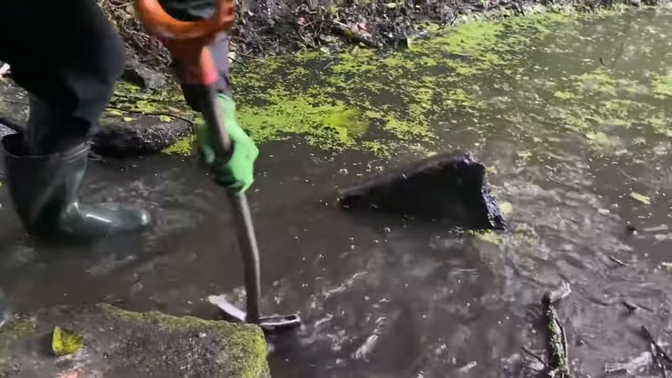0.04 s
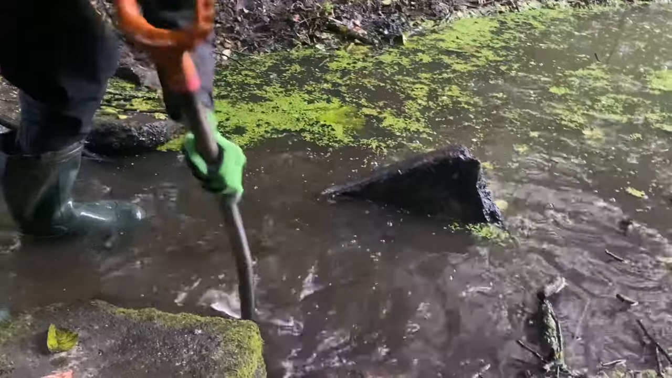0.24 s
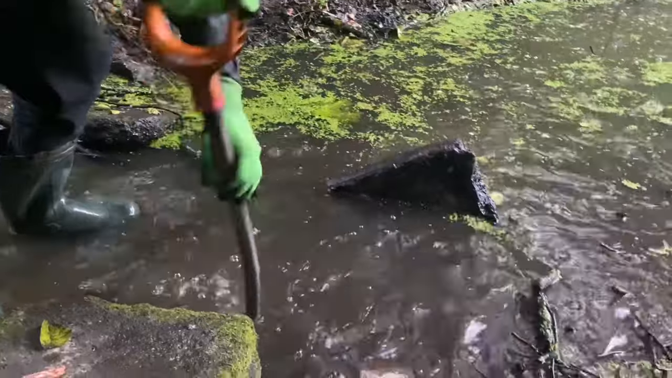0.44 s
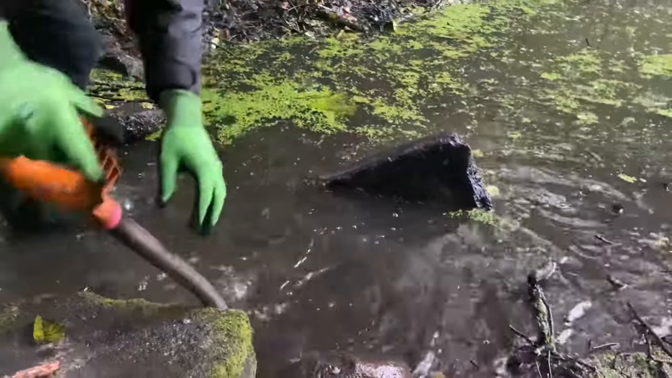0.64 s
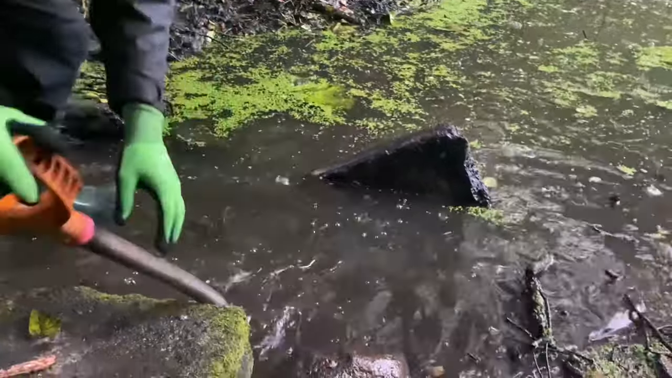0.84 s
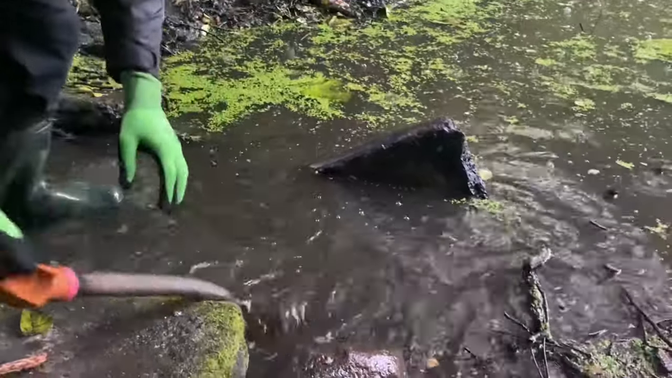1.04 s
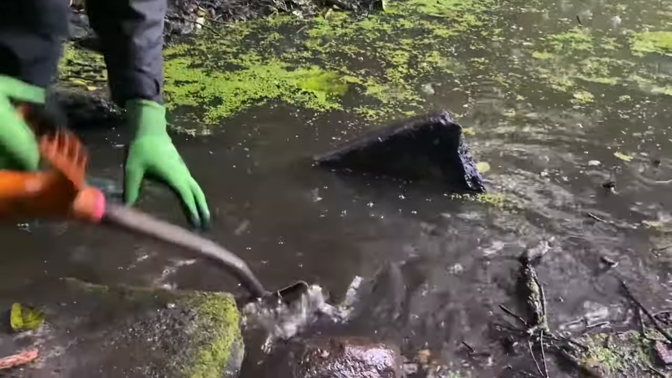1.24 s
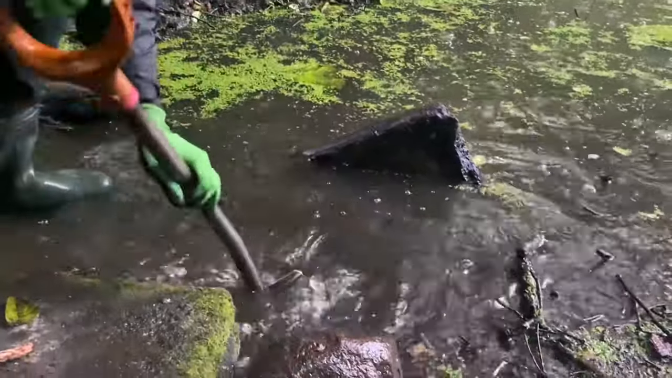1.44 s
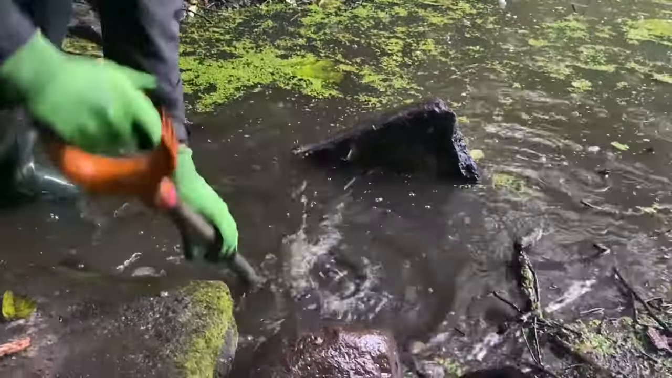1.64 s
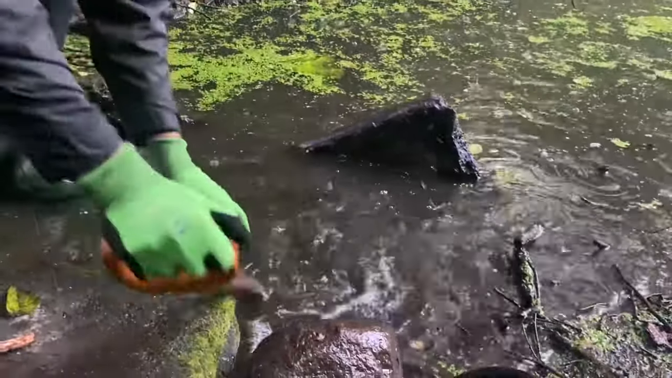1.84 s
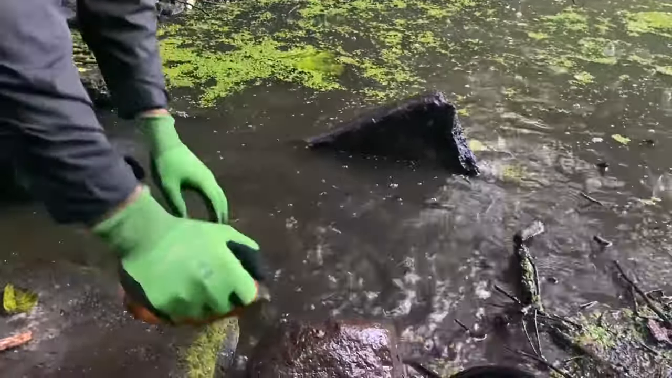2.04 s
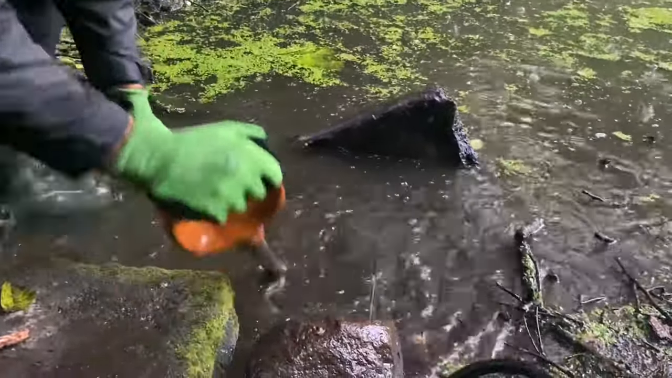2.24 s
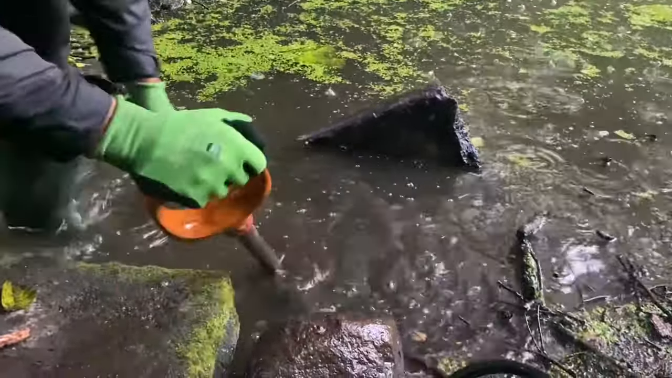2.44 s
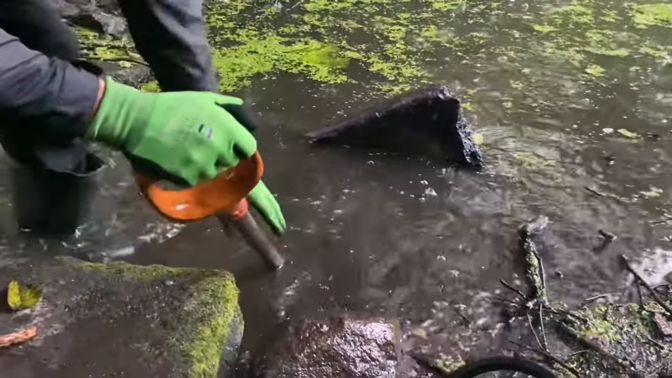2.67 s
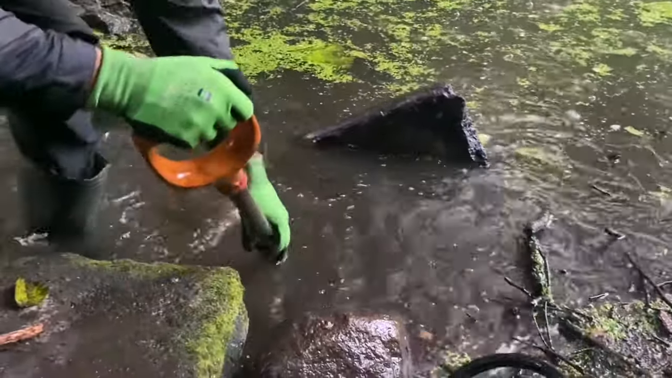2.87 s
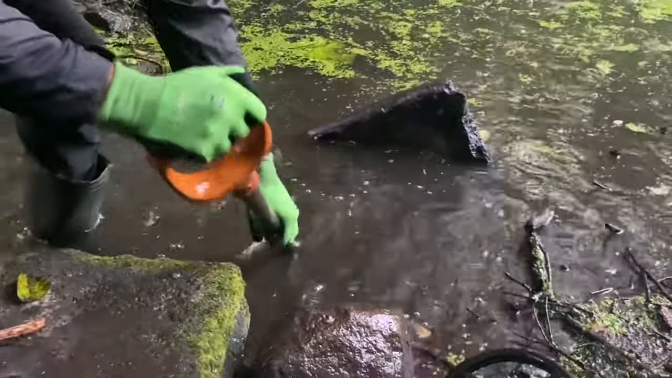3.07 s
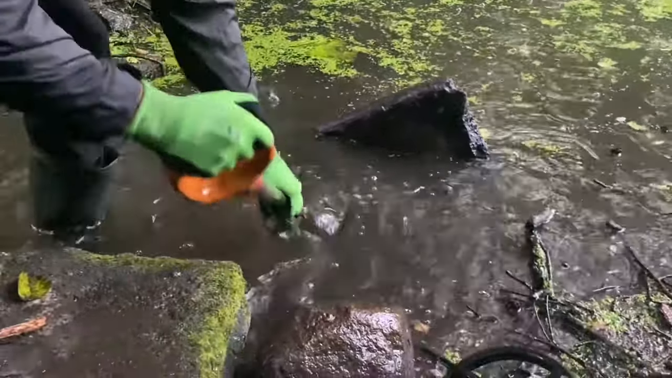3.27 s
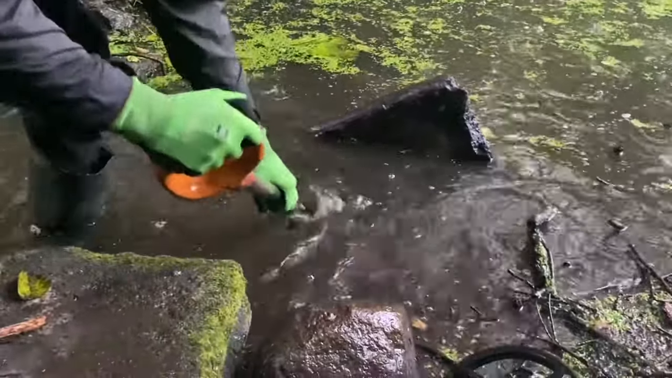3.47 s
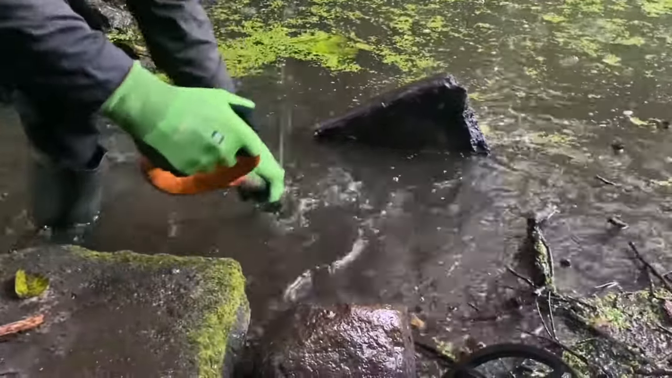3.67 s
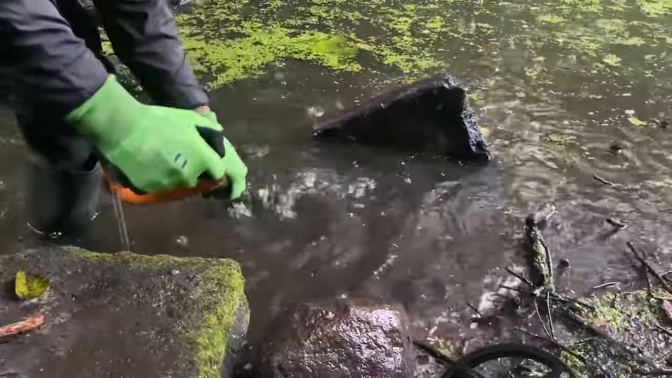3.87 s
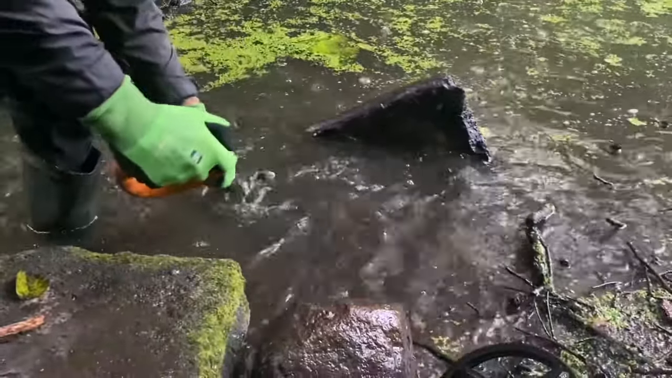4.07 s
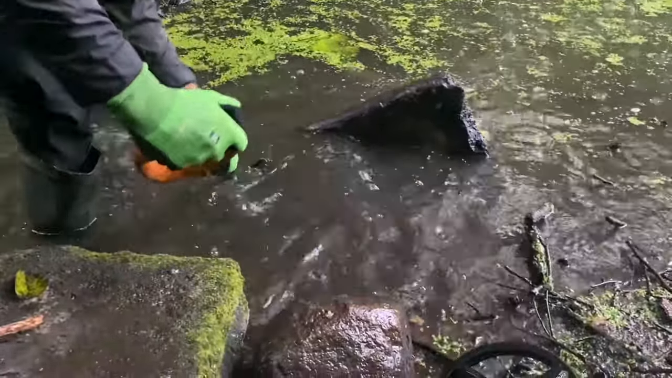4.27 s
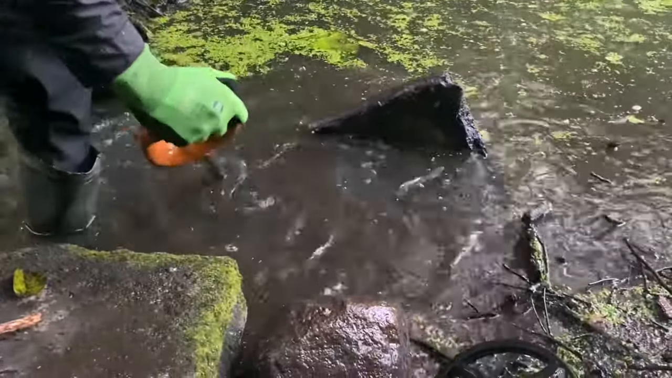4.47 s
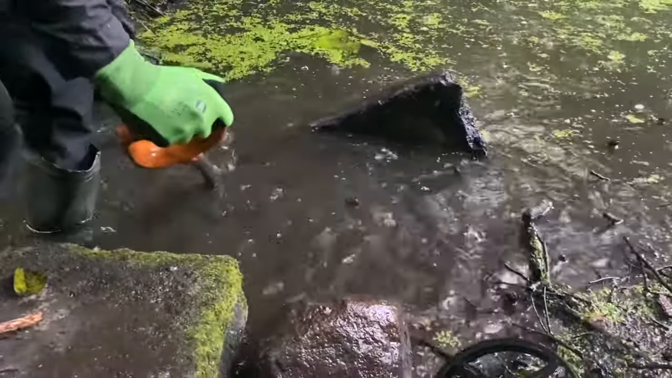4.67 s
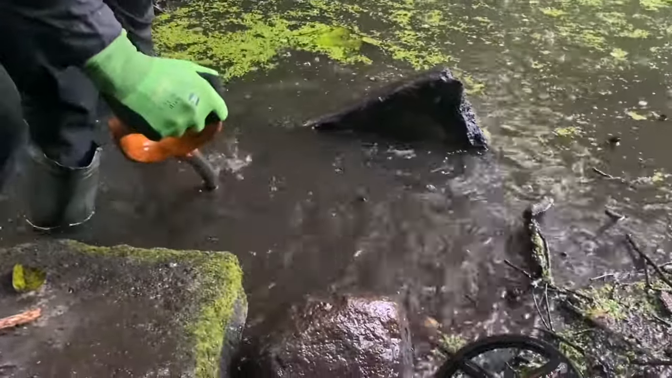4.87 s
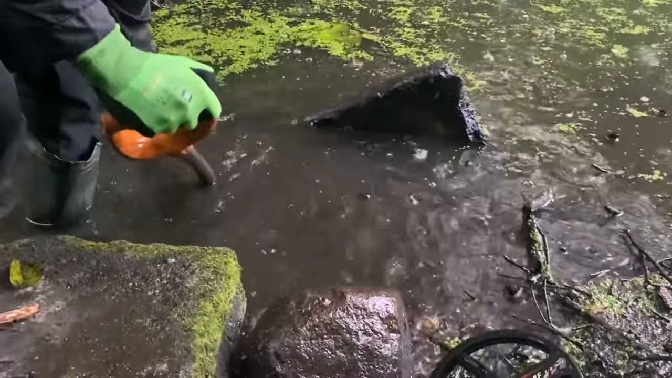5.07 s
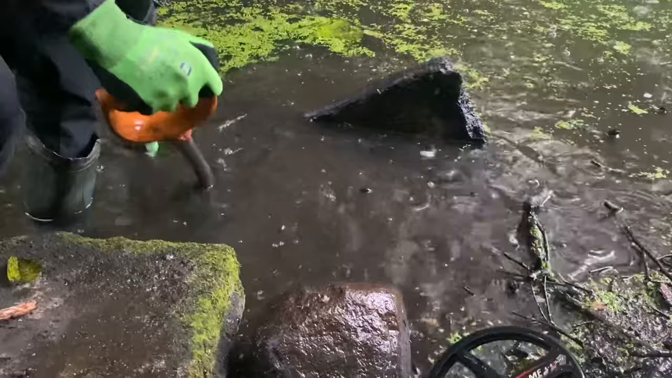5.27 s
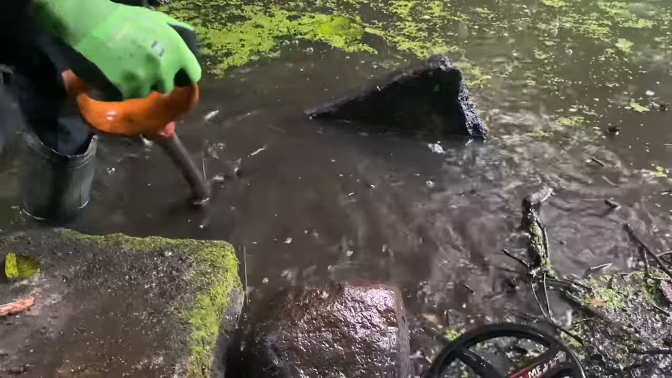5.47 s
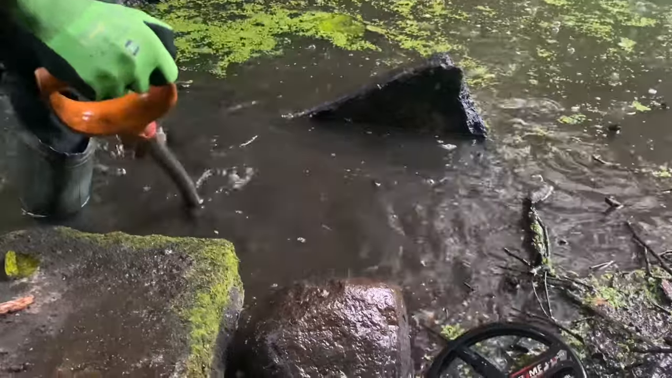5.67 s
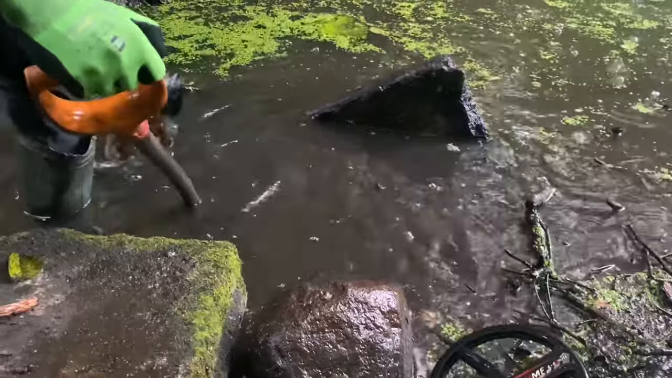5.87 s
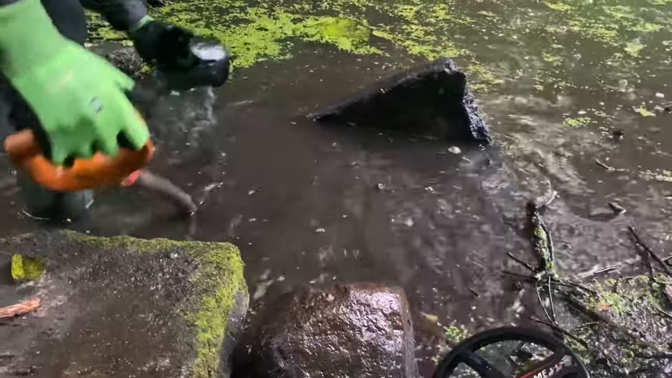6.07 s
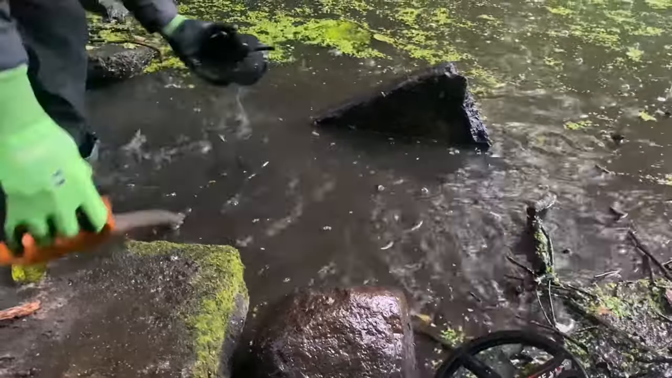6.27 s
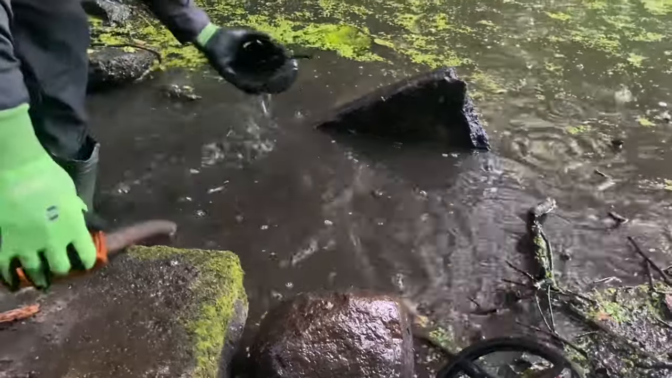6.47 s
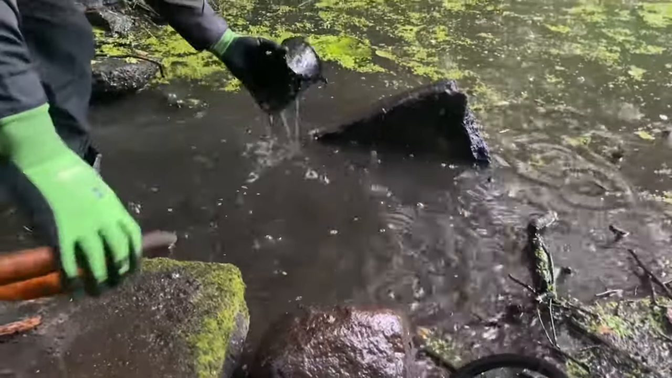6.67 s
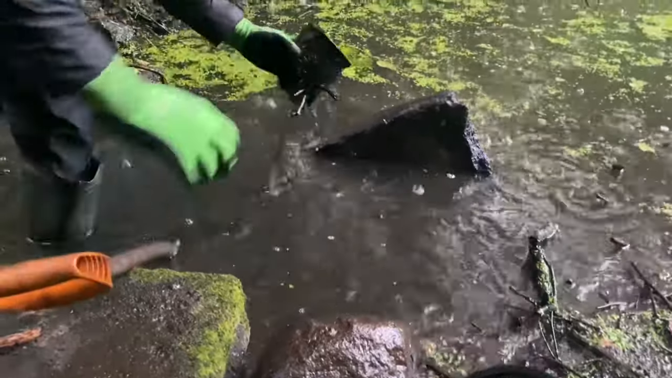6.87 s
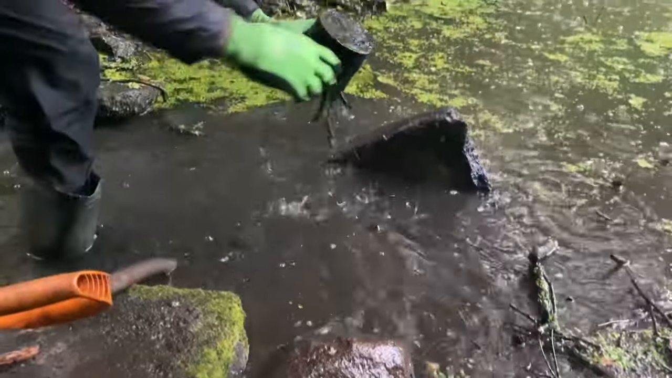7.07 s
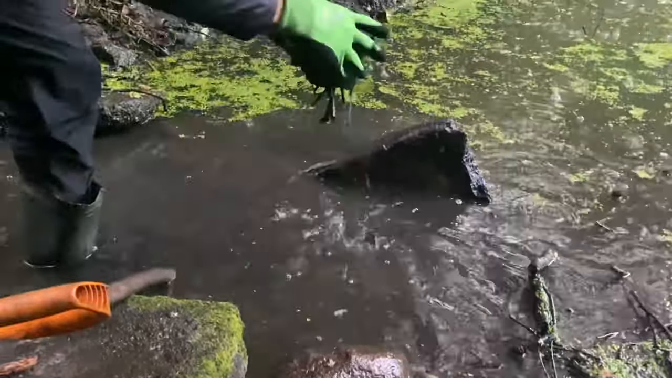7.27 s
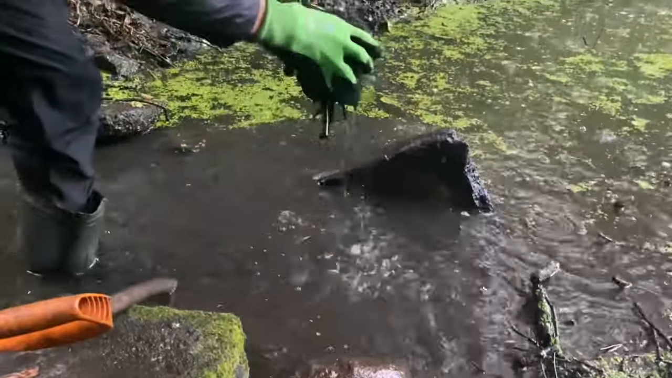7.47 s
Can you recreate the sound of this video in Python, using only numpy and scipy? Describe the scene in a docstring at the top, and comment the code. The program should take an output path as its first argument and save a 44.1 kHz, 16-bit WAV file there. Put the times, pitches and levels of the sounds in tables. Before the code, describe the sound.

Someone digs in a stony, shallow stream bed beside a close stereo microphone. First a short gravel scrape, then a tight cluster of hollow, water-muffled knocks, the loudest moment. Water slaps and bubbles in quick bursts, settles, then another scrape with metal catching on stones. Low heaving churn and small gurgles fade, leaving the quiet patchy stream with drops plinking and ticking onto its surface.

```python
"""A shallow stream trickles while a shovel scrapes through its gravel and knocks dully under water, heard close up.
Stirred water splashes, gulps and bubbles over a low churn; drops plink into the stream, often near the end.
The stream is patchy noise with showers of small bubble rings; rumble, scrapes and splashes are shaped noise and grains.
Knocks and steel catches are ringing modes; gulps, bubbles and drips are sliding tones; ticks are short gritty pings.
Faint reflections surround the near sounds, and the whole is given a stereo width, phase and balance."""
import sys
import numpy as np
from scipy import signal
from scipy.fft import rfft, irfft
from scipy.io import wavfile
from scipy.ndimage import uniform_filter1d

SR = 44100
rng = np.random.default_rng(int(sys.argv[2]) if len(sys.argv) > 2 else 0)


def wrap_up_sound(samples):
    """Save the sound to the file named by the first command line argument, as 16-bit audio."""
    columns = np.atleast_2d(samples).T
    # keep every value between -1 and 1, then stretch to whole-number steps
    tamed = np.clip(columns, -1, 1)
    steps = np.round(tamed * 32767).astype(np.int16)
    wavfile.write(sys.argv[1], SR, steps)


N = 331191
TIME = np.arange(N) / SR


def amp(db):
    """Turns decibels into an amplitude gain."""
    return 10 ** (np.asarray(db) / 20)


def unit(x):
    """Scales a sound to rms 1, all channels together."""
    return x / np.sqrt(np.mean(x ** 2) + 1e-20)


def read(points, hz):
    """Reads a table of values over frequency, on a logarithmic frequency axis."""
    f, value = np.transpose(points)
    return np.interp(np.log(hz + 1), np.log(f + 1), value)


def colour(x, spectrum, tilt_db=0):
    """Filters by a spectrum, tilted in dB per octave about 1.5 kHz, and scales to rms 1."""
    hz = np.fft.rfftfreq(x.shape[-1], 1 / SR)
    octaves = np.log2(np.maximum(hz, 250) / 1500)  # the tilt stops below 250 Hz
    gain = amp(read(spectrum, hz) + tilt_db * octaves)
    return unit(irfft(rfft(x) * gain, x.shape[-1]))


def add(mix, s, sound):
    """Mixes a sound in at time s, cut off at the end of the mix."""
    part = mix[..., max(round(s * SR), 0):][..., :sound.shape[-1]]
    part += sound[..., :part.shape[-1]]


def swell(t, rise, fall):
    """Rounded hump that peaks at t = 0."""
    return np.exp(-abs(t / np.where(t < 0, rise, fall)) ** 2.0)


def waver(size):
    """Smooth random wandering, rms 1; size is the smoothing in samples."""
    once = uniform_filter1d(rng.standard_normal(N), size=size)
    return unit(uniform_filter1d(once, size=size // 2))


def bubble(first_hz, last_hz, length):
    """A pocket of air rings briefly; its pitch slides at a quickening pace, then holds for the tail."""
    u = np.linspace(0, 1.5, max(int(1.5 * length * SR), 8))  # time in lengths
    hz = first_hz * (last_hz / first_hz) ** np.minimum(u, 1.1) ** 1.13
    attack = 1 - np.exp(-u / 0.08)
    shape = attack * np.exp(-1.77 * u ** 0.33) * (1 - u / u[-1])
    return shape / shape.max() * np.sin(2 * np.pi * np.cumsum(hz) / SR)


def babble(low_hz, high_hz, per_s, range_db, cycles, count):
    """A shower of bubbles in many sizes, small ones more frequent, each balanced at random over two channels."""
    out, sizes_hz = np.zeros((2, N)), np.geomspace(low_hz, high_hz, count)
    shares = np.sqrt(sizes_hz) / np.sqrt(sizes_hz).sum()
    for hz, share in zip(sizes_hz, shares):
        ring = bubble(hz, hz * 1.08, cycles / hz)
        when, draw, turn = rng.random((int(per_s * share * N / SR), 3)).T
        strength = amp(range_db * np.minimum(-np.log(1 - draw), 4))  # a few stand out
        angle = 2 * np.pi * turn
        train = np.zeros((2, N))
        train[:, (when * N).astype(int)] = strength * np.array([np.cos(angle), np.sin(angle)])
        out += signal.oaconvolve(train, ring[None], axes=1)[:, :N] * hz / np.sqrt(share)
    return unit(out)


def strokes(rows, grains, spectrum, rise_share, smooth_db, side_db, hollow_db, hollow_octaves):
    """Swelling and fading showers of grains and noise, coloured by a spectrum and one broad resonance."""
    out = np.zeros((2, N))
    source = grains + amp(smooth_db) * rng.standard_normal((2, N))
    for s, db, fall, tilt_db, hollow_hz in rows:
        rise = rise_share * fall
        during = (TIME > s - 2 * rise) & (TIME < s + 3 * fall)
        t = TIME[during] - s
        octaves = np.log2((np.fft.rfftfreq(len(t), 1 / SR) + 1) / hollow_hz)
        resonance = amp(hollow_db * np.exp(-(octaves / hollow_octaves) ** 2))
        hollow = irfft(rfft(source[:, during]) * resonance, len(t))
        mid, side = colour(hollow, spectrum, tilt_db) * swell(t, rise, fall)
        side = amp(side_db) * side
        out[:, during] += amp(db) * np.array([mid + side, mid - side])
    return out


def banks(x, t60, wet_db):
    """Faint, quickly dying reflections from the water, stones and banks: sparse random echoes after 3 ms."""
    t = np.arange(SR // 4) / SR
    signs = rng.choice([-1, 1], (2, len(t)))
    taps = signs * (rng.random((2, len(t))) < .05) * (t > .003)
    taps = taps * amp(-60 * t / t60)
    taps = taps / np.linalg.norm(taps, axis=1, keepdims=True)
    return x + amp(wet_db) * signal.oaconvolve(x, taps, axes=1)[:, :N]


def drifting(bins, frames, shape):
    """Random map over frequency and time, smoothed over so many bins and frames, rms 1."""
    across = uniform_filter1d(rng.standard_normal(shape), size=bins, axis=0)
    return unit(uniform_filter1d(across, size=frames, axis=1))


def stream(level_db=-40, babble_db=-13.0, spatter_db=-10, patchy_db=1.25, flicker_db=0.65):
    """The running stream: a patchy wash of far water, nearer bubbling and the dry spatter of droplets."""
    # colour of the stream: (frequency [Hz], filter gain [dB])
    water_colour = [(88, -34), (150, -8.5), (453, -2.5), (607, -2), (796, -3.5), (860, -3.5), (1480, -5),
                    (1830, -5), (2500, -8), (7270, -14), (9000, -20.5), (10100, -16), (12300, -19),
                    (14300, -20), (15500, -41)]
    z = signal.stft(rng.standard_normal((2, N)), nperseg=512)[2]
    patches = drifting(6, 9, z.shape[1:])
    flicker = drifting(90, 5, z.shape[1:])  # wide bands lift and dip at once
    gain = amp(patchy_db * patches + flicker_db * flicker)
    wash = unit(signal.istft(z * gain, nperseg=512)[1][:, :N])
    bubbling = babble(low_hz=522, high_hz=4560, per_s=700, range_db=2.0, cycles=13.6, count=24)
    spatter = babble(low_hz=694, high_hz=13700, per_s=420, range_db=4.0, cycles=2.56, count=10)
    water = wash + amp(babble_db) * bubbling + amp(spatter_db) * spatter
    return amp(level_db) * colour(water, water_colour)


def rumble(gain_db=5.0, rise=0.04, fall=0.024):
    """Low churn of the water around the blade and the boots: deep noise that heaves at each shove [s]."""
    # how much the digging stirs the water: (time [s], level before the overall gain [dB])
    stir = [(0.0, -51.5), (0.48, -50), (1.2, -50), (2.3, -52.5), (2.65, -47.5), (3.0, -51.5), (3.65, -49),
            (4.3, -54), (4.9, -53), (5.7, -55.5), (6.2, -59), (7.5, -59)]
    # the blade shoves a mass of water aside: (time [s], level before the overall gain [dB])
    heaves = [(0.28, -41), (0.75, -44), (1.07, -42), (1.31, -44), (2.82, -53), (3.09, -41), (3.58, -42),
              (3.74, -37.5), (3.83, -46), (4.12, -41.5), (4.93, -48), (5.2, -48), (5.53, -47)]
    # colour of the deep rumble: (frequency [Hz], filter gain [dB])
    deep_colour = [(15, -48), (28, -10), (45, -2), (65, 1.5), (100, -7.5), (135, -6), (220, -22),
                   (400, -62)]
    power = amp(np.interp(TIME, *np.transpose(stir))) ** 2
    t = np.arange(-3 * rise, 3 * fall, 1 / SR)
    for s, db in heaves:
        add(power, s + t[0], (amp(db) * swell(t, rise, fall)) ** 2)
    return amp(gain_db) * np.sqrt(power) * colour(rng.standard_normal((2, N)), deep_colour)


def drips(rise=0.00012, slap_db=-11, slap_s=0.0022, lift=0.19):
    """A tiny slap on the surface, then the plink of trapped air, rising by the share `lift` over its t60."""
    # drops fall into the stream: (time [s], plink peak [dB], starting pitch [Hz], t60 [s])
    drops = [(1.083, -28, 1730, 0.02), (1.107, -30, 1860, .018), (1.1155, -33, 3050, .016),
             (1.1245, -37, 3380, .016), (1.128, -32, 2880, .012), (1.143, -34.5, 2870, .03),
             (1.151, -38, 3100, .016), (1.472, -32, 1000, 0.011), (2.603, -28, 1950, 0.014),
             (3.404, -29.5, 2770, 0.022), (3.439, -32, 1230, 0.022), (3.516, -28, 1950, 0.0096),
             (3.532, -37, 600, .02), (5.817, -26.5, 1880, 0.0076), (5.847, -35, 1110, .022),
             (5.906, -30, 1154, 0.044), (5.975, -36.5, 730, 0.058), (5.997, -29, 1620, 0.01),
             (6.138, -28, 802, 0.091), (6.2, -34, 574, 0.11), (6.313, -34, 660, 0.035),
             (6.313, -32, 1700, .009), (6.372, -31, 348, 0.029), (6.5376, -28, 3020, 0.008),
             (6.538, -28, 1530, 0.008), (6.542, -35, 3270, 0.011), (6.956, -34, 1150, 0.016),
             (6.986, -34, 3130, .015), (7.056, -30.5, 1620, 0.017), (7.0558, -30, 1210, 0.0177),
             (7.125, -32.5, 3080, 0.0235), (7.172, -30, 1850, 0.0068), (7.197, -36, 650, .03),
             (7.246, -35, 1870, .018), (7.257, -28.5, 4700, 0.0194), (7.293, -25.5, 2920, 0.02),
             (7.3788, -32.5, 716, 0.055), (7.3812, -27.5, 416, 0.22), (7.471, -40, 900, .03)]
    out, t = np.zeros(N), np.arange(SR // 5) / SR
    for s, db, hz, t60 in drops:
        phase = 2 * np.pi * hz * np.cumsum(1 + lift * t / t60) / SR
        plink = np.sin(phase) * (1 - np.exp(-t / rise)) * amp(-60 * t / t60)
        splat = colour(rng.standard_normal(len(t)), [(hz / 4, -20), (hz, 0), (hz * 4, -22)])
        slap = splat * np.exp(-t / slap_s)
        add(out, s, amp(db) * (plink / abs(plink).max() + amp(slap_db) * slap))
    return out


def gulps(cycles=4.6, sink_octaves=0.99):
    """Big air pockets collapse with a low gulp that sinks by about an octave."""
    # the collapsing pockets: (time [s], peak [dB], first pitch [Hz])
    pockets = [(0.057, -36.5, 332), (0.8, -37, 238), (0.818, -32, 192), (1.053, -34, 151),
               (1.095, -29.5, 278), (1.237, -29.5, 214), (1.548, -30.5, 257), (1.786, -33, 197),
               (2.17, -34, 182), (3.318, -26.5, 273), (4.108, -35, 174), (4.342, -32, 159),
               (6.044, -35, 153)]
    out = np.zeros(N)
    for s, db, hz in pockets:
        add(out, s, amp(db) * bubble(hz, hz / 2 ** sink_octaves, cycles / hz))
    return out


def bubbles(splash, wobble_db=0.5, wobble_octaves=0.039, churn_db=-36, calm=0.64):
    """Bubbles sing on until they reach the surface; ripples shake pitch and level a little, a splash more."""
    # air rising from the stirred bed:
    # (time [s], peak before wobble [dB], first pitch before wobble [Hz], pitch rise [octaves], length [s])
    rising_air = [(0.455, -33, 499, -0.19, 0.027), (0.488, -37, 557, 0.41, 0.018),
                  (1.067, -26.5, 510, -0.02, 0.013), (1.086, -23, 590, -0.49, 0.0069),
                  (1.11, -33, 714, 0.32, 0.018), (1.128, -33, 690, -0.14, 0.015),
                  (1.14, -38, 550, -.4, .025), (1.151, -36, 1200, -0.088, 0.012),
                  (1.187, -36, 470, -0.035, 0.027), (1.221, -33, 446, 0.71, 0.021),
                  (1.237, -31.5, 675, -0.0028, 0.023), (1.267, -36.5, 1070, 0.3, 0.028),
                  (1.28, -33, 312, -0.86, 0.029), (1.336, -35.5, 348, 0.25, 0.029),
                  (1.372, -40.5, 626, 0.087, 0.03), (1.474, -33.5, 430, -0.096, 0.02),
                  (1.4915, -25.5, 1370, -0.03, 0.012), (1.573, -31, 1860, 0.042, 0.0058),
                  (1.526, -20, 1265, -0.18, 0.015), (1.537, -25, 883, -0.07, 0.014),
                  (1.551, -37, 559, -0.45, 0.026), (1.579, -30.5, 420, 0.079, 0.016),
                  (1.59, -23.5, 1040, 0.12, 0.0036), (2.371, -36, 335, 0.88, 0.07),
                  (2.593, -39, 548, 0.83, 0.022), (2.622, -42, 600, 0.44, 0.061),
                  (3.189, -36, 800, -1.05, 0.015), (3.347, -35, 482, -0.25, 0.025),
                  (3.367, -39, 470, 0.5, 0.024), (3.394, -36, 690, 0.27, 0.014),
                  (3.431, -36, 703, 0.43, 0.024), (3.41, -39, 1160, .2, .012),
                  (3.904, -32, 1134, 0.39, 0.017), (4.154, -34.5, 760, 0.26, .016),
                  (4.356, -39, 770, -0.21, 0.023), (4.58, -40, 327, 0.17, 0.024),
                  (4.606, -39, 349, .36, 0.05), (4.665, -46, 430, -0.6, 0.03),
                  (4.699, -45, 335, 0.59, .041), (4.738, -37.5, 690, 0.06, 0.018),
                  (4.758, -33, 439, 0.98, 0.037), (4.801, -37, 710, 0.34, 0.023),
                  (5.858, -38.5, 752, -0.12, 0.038)]
    splash_rms = np.sqrt(abs(uniform_filter1d(splash[0] ** 2, size=1000)))
    churn = np.tanh(calm + splash_rms / amp(churn_db))
    out, shake = np.zeros(N), wobble_octaves * churn * waver(size=360)
    for s, db, hz, octaves, length in rising_air:
        u = np.linspace(0, 1, max(int(length * SR), 8))  # time in lengths
        shape = (1 - np.exp(-u / 0.047)) * np.exp(-0.72 * u) * (1 - u ** 6)
        slide = octaves * u ** 2.14
        pitch = hz * 2 ** (slide + np.interp(s + u * length, TIME, shake))
        add(out, s, amp(db) * shape / shape.max() * np.sin(2 * np.pi * np.cumsum(pitch) / SR))
    return out * amp(wobble_db * churn * waver(size=300))


def ticks(grit_db=3, t60_at_1khz=0.038, t60_slope=0.76):
    """A very short ping, the higher the shorter [s], with a gritty edge in the octaves around it."""
    # sharp ticks of pebbles and droplets: (time [s], peak [dB], pitch [Hz])
    pings = [(0.664, -27, 3100), (1.0195, -23, 5960), (1.0215, -27, 6100), (1.0197, -24, 3560),
             (1.093, -28, 3300), (1.4723, -30, 3430), (1.5258, -16, 3830), (1.7793, -24, 4360),
             (1.7807, -24, 5900), (1.7925, -23, 5500), (1.799, -26, 5700), (1.9015, -28, 3140),
             (2.2388, -14.5, 7900), (2.922, -30, 12000), (3.315, -20, 3280), (3.4246, -26, 7200),
             (3.434, -33, 4200), (3.518, -29, 4370), (3.566, -30, 4030), (3.9690, -23, 11600),
             (4.3190, -28, 12000), (5.1905, -21, 11400), (5.7887, -22, 12000), (5.843, -29, 11500),
             (5.9963, -25, 12400), (6.1286, -23, 6840), (6.137, -22, 10200), (6.2793, -27.5, 12100),
             (6.289, -23, 10800), (6.5243, -30, 6400), (6.5516, -29, 6600), (7.296, -29, 4200),
             (7.4870, -26.5, 6000)]
    out, t = np.zeros(N), np.arange(SR // 30) / SR
    for s, db, hz in pings:
        t60 = t60_at_1khz * (1000 / hz) ** t60_slope
        edge = colour(rng.standard_normal(len(t)), [(hz / 6, -38), (hz / 2, -14), (hz, 0), (hz * 4, -32)])
        ping = (np.sin(2 * np.pi * hz * t) + amp(grit_db) * edge) * amp(-60 * t / t60)
        add(out, s, amp(db) * ping / abs(ping).max())
    return out


def splashes():
    """Water thrown by the blade: bursts of dense froth with larger bubbles ringing out of it one by one."""
    # the bursts: (time of the peak [s], mid and side level there before side trim [dB], fall [s], # tilt [dB
    # per octave], hollow [Hz])
    bursts = [(0.51, -42.5, 0.052, -5, 715), (1.028, -36.5, 0.011, -1, 2830), (1.076, -33, 0.015, 0, 1410),
              (1.086, -31, 0.0038, -1, 1600), (1.0945, -32, 0.0033, -3, 3200), (1.13, -37, 0.047, -6, 900),
              (1.198, -42, 0.013, -0.5, 1900), (1.243, -40, 0.017, -2, 1300),
              (1.29, -41.5, 0.022, -2.5, 1310), (1.342, -42, 0.0099, -1, 1750),
              (1.493, -33.5, 0.0072, 0, 4030), (1.513, -31.5, 0.014, -0.5, 1690),
              (1.528, -27.5, 0.005, 2, 3900), (1.539, -23.5, 0.0071, 0.5, 3160),
              (1.557, -30.5, 0.012, -1, 3600), (1.576, -32, 0.0059, -1.5, 1900),
              (1.590, -31.5, 0.01, -4, 1000), (1.792, -35, 0.022, 0, 510), (1.83, -38, 0.0047, 1.5, 4000),
              (1.905, -39, 0.02, 0.5, 700), (2.185, -41, 0.047, 1.5, 750),
              (3.316, -30, 0.00358, -2.5, 3200), (3.324, -31.5, 0.0089, -2.5, 1000),
              (3.397, -40, 0.036, -3.5, 1620), (3.44, -42.5, 0.026, 1, 1190),
              (3.522, -41, 0.026, 0.5, 1410), (3.745, -46.5, 0.22, -3, 770), (4.138, -39, 0.037, -1, 920),
              (4.222, -43, 0.012, 1.5, 3800), (4.343, -35, .003, -2, 1150),
              (4.358, -40.5, 0.021, -0.5, 1110), (4.66, -53.5, 0.072, -5, 400), (4.785, -45, .035, -9, 680),
              (4.912, -40.5, 0.014, 1.5, 2300), (5.87, -45.5, 0.18, 0.5, 980),
              (6.99, -46, 0.087, 2.5, 1500), (7.25, -49.5, 0.16, 3.5, 2000), (7.473, -37.5, 0.0087, 1, 600)]
    # colour of a splash: (frequency [Hz], filter gain [dB])
    spray = [(60, -33), (180, -7), (450, -1), (1250, -4), (2000, -9), (3600, -11.5), (5500, -15.5),
             (9000, -9.5), (15500, -27)]
    froth = babble(low_hz=265.3, high_hz=14420, per_s=7000, range_db=3.0, cycles=6.7, count=28)
    gurgle = babble(low_hz=447.5, high_hz=5006, per_s=1400, range_db=1.0, cycles=14.2, count=26)
    return strokes(bursts, froth + amp(-2.0) * gurgle, spray, rise_share=0.79, smooth_db=-9,
                   side_db=-6.5, hollow_db=6.5, hollow_octaves=0.5)


def catches(crunch_s=0.0017):
    """The blade catches on a stone: a crunch at the edge, for an instant, sets the steel ringing."""
    # single stones caught and slipped: (time [s], peak [dB], pitch factor)
    stones = [(0.2338, -33, 1.22), (0.263, -32, 1.1), (0.2925, -23.5, .96), (0.305, -32, .96),
              (0.3246, -32, 1), (3.0592, -34, .96), (3.1002, -26, 1.03), (3.167, -27, 1.23),
              (3.2434, -31, 1.04), (3.2982, -28, 1.05)]
    # ring of the steel blade: (frequency before the pitch factor [Hz], level [dB], t60 [s])
    steel_modes = [(900, -4, .02), (2710, 2.5, 0.047), (3270, -1, .02), (4530, -10, 0.023),
                   (6700, -7, 0.011)]
    out, t = np.zeros(N), np.arange(SR // 20) / SR
    for s, db, pitch in stones:
        steel = sum(amp(mode_db - 60 * t / t60) * np.sin(2 * np.pi * pitch * hz * t)
                    for hz, mode_db, t60 in steel_modes)
        crunch = rng.standard_normal(len(t)) ** 3 * np.exp(-t / crunch_s)  # cubing makes it spiky
        ring = signal.fftconvolve(steel, crunch)[:len(t)]
        add(out, s, amp(db) * ring / abs(ring).max())
    return out


def scrapes():
    """The blade dragged through gravel: swelling showers of short grains, with a hollow under the blade."""
    # the drags: (time of the peak [s], mid and side level there before side trim [dB], fall [s],
    # tilt [dB per octave], hollow [Hz])
    drags = [(0.234, -37.5, 0.0064, 6, 4800), (0.256, -34, 0.02, 0, 4700), (0.286, -31, 0.025, -0.5, 556),
             (0.32, -39, 0.015, -0.5, 4550), (3.095, -35.5, 0.053, 0.7, 890), (3.152, -35, 0.024, 0.1, 780),
             (3.171, -31, 0.005, 0, 800), (3.298, -39.5, 0.019, 2, 1700)]
    # colour of the scraping blade: (frequency [Hz], filter gain [dB])
    blade = [(60, 3), (160, 5), (550, 1.5), (1000, 3), (1450, 0), (2100, -8), (2450, 1), (2680, 4.7),
             (2980, -2), (3300, -3), (3900, -10), (4550, -6), (5700, -8.5), (7500, -11.5), (12000, -18),
             (16000, -30)]
    gravel = babble(low_hz=211.5, high_hz=13040, per_s=9000, range_db=2.5, cycles=4.4, count=16)
    return strokes(drags, gravel, blade, rise_share=1.0, smooth_db=-2.5,
                   side_db=-3.0, hollow_db=5.5, hollow_octaves=0.35)


def knocks():
    """Shovel against stones: water cushions each blow, so the modes swell in softly and die fast."""
    # the blows; pitch shifts with how deep the blade sits:
    # (time [s], peak [dB], most excited pitch [Hz], spread [octaves], pitch factor, rise [s])
    blows = [(0.6628, -8, 785, 1.14, 0.95, 0.0021), (0.6712, -11.5, 620, 0.26, 0.94, 0.0008),
             (0.7026, -9.5, 392, 1.4, 0.96, 0.0024), (0.7597, -15, 390, 1.2, 0.99, 0.0049),
             (1.7896, -20.5, 830, 0.8, 0.95, 0.0022), (2.1404, -30.5, 570, 1.04, 0.92, .0021),
             (3.3135, -24.5, 900, 0.89, 0.74, .0021), (4.3397, -27.5, 740, 0.9, 0.79, .0014)]
    # ring of the shovel under water: (frequency before the pitch factor [Hz], level [dB], t60 [s])
    shovel_modes = [(384, -3.5, 0.055), (600, -1.5, 0.022), (746, -0.5, 0.02), (898, -1.5, 0.046),
                    (1096, -5, 0.022), (1600, -11, 0.04)]
    out, t = np.zeros(N), np.arange(SR // 6) / SR
    for s, db, centre_hz, spread, pitch, rise in blows:
        ring = np.zeros(len(t))
        for hz, mode_db, t60 in shovel_modes:
            octaves_off = np.log2(pitch * hz / centre_hz)
            excitation = 1 / (1 + (2 * octaves_off / spread) ** 2)
            ring += excitation * amp(mode_db - 60 * t / t60) * np.sin(2 * np.pi * pitch * hz * t)
        ring = ring * (1 - np.exp(-(t / rise) ** 2))
        add(out, s, amp(db) * ring / abs(ring).max())
    return out


def scene():
    """The digging over the running stream, each group of near sounds with its own reflections."""
    splash = splashes()
    knocking = banks(np.array([knocks()] * 2), t60=0.062, wet_db=-8.5)
    air = bubbles(splash) + gulps() + drips()
    surface = banks(np.array([air] * 2), t60=0.09, wet_db=-15)
    digging = banks(scrapes() + catches() + splash + ticks(), t60=0.1, wet_db=-8.5)
    return stream() + rumble() + surface + digging + knocking


def record(dry):
    """Sets stereo width, balance and the phase between left and right; then a low-pass at 15.7 kHz."""
    # stereo width: (frequency [Hz], side gain [dB])
    width = [(60, -33), (160, -6), (320, -5.5), (700, -5), (1400, -0.5), (3000, -3), (5500, -5),
             (7900, -1.5), (8600, -16), (9500, -94), (10400, -16), (12300, -22), (13800, -4), (15000, -22)]
    # phase by which the left channel leads: (frequency [Hz], phase [rad])
    channel_phase = [(40, .55), (170, .65), (340, -.3), (900, -.6), (1500, -1.3), (2100, .4), (3000, -.6),
                     (5500, -.9), (6900, .1), (8450, 3.1), (9550, 3.2), (11700, 6.25), (13000, 6.35),
                     (14700, 9.4)]
    # balance, left minus right: (frequency [Hz], level [dB])
    balance = [(60, 0), (200, 2), (1000, 0.5), (1800, 3), (2900, -3), (5500, -1), (7400, 1.5), (8600, 0.5)]
    hz = np.fft.rfftfreq(N, 1 / SR)
    left, right = rfft(dry)
    mid, side = (left + right) / 2, (left - right) / 2 * amp(read(width, hz))
    lean = amp(read(balance, hz) / 2)  # half the difference to each channel
    lag = np.exp(-1j * read(channel_phase, hz))
    stereo = irfft(np.array([(mid + side) * lean, (mid - side) / lean * lag]), N)
    low_pass = signal.firwin(401, 15700, window=("kaiser", 9), fs=SR)
    return signal.oaconvolve(stereo, low_pass[None], "same")


dry = scene()
out = record(dry)
wrap_up_sound(out)
```